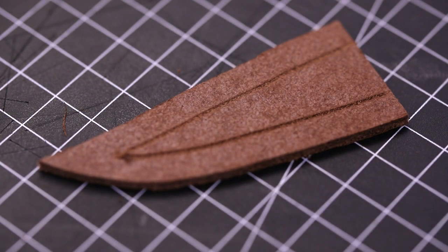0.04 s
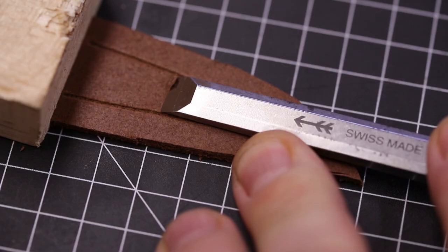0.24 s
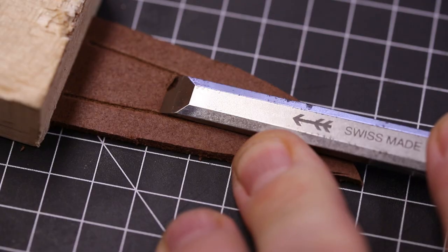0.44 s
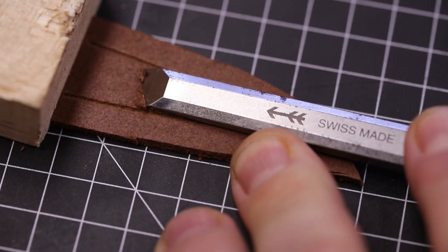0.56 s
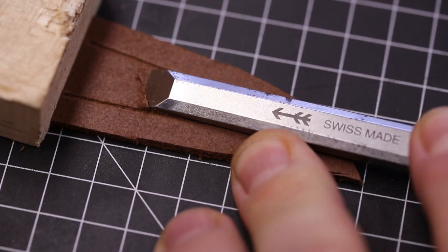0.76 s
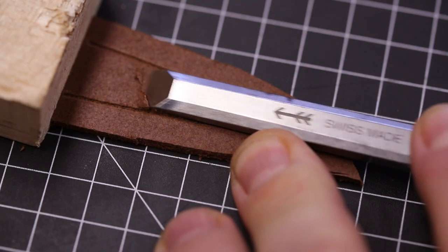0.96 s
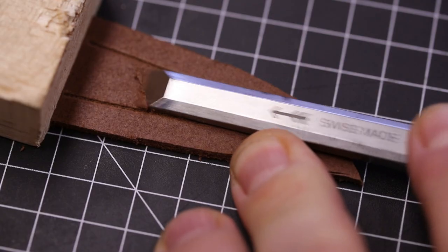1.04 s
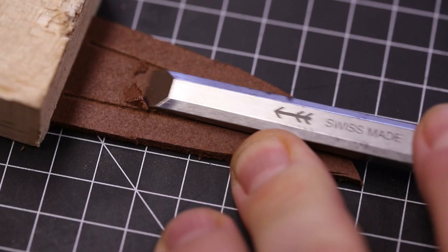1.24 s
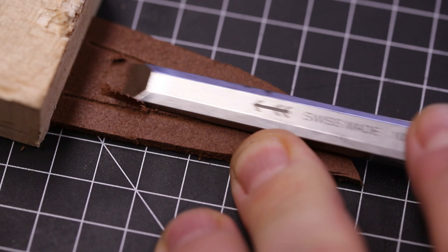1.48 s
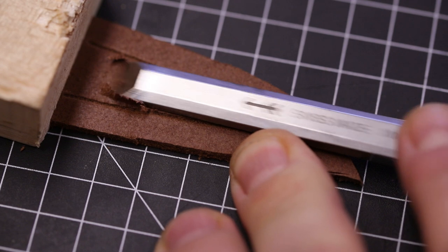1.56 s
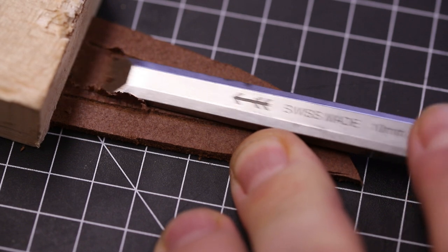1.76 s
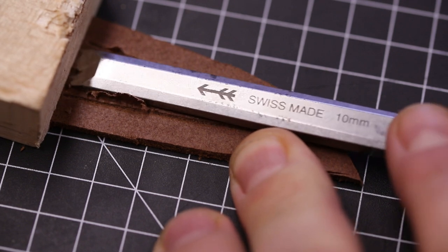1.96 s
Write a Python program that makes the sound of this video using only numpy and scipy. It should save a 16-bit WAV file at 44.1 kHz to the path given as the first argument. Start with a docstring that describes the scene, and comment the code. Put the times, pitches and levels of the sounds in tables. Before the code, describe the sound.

A chisel cuts thick leather in short pushes, heard close in a small boomy room. Faint room tone, soft rubs and light bench knocks come first. A swelling scrape breaks with a knock at 0.7 s, then lighter handling. Crunchy, tearing pushes follow around 1.2, 1.45 and 1.7 s, with thuds, bright scratches and a brief steel chirp at 1.75 s. A last scrape starts swelling near 1.97 s.

```python
"""Over faint room tone, hand and leather rub softly (shaped noise) and tool and hand knock lightly on a bench.
Then a chisel is pushed through thick leather, close to the microphone, in a small boomy room.
In each push the edge creeps with a swelling hiss of tiny snaps; in the first four it breaks through with a knock.
It then tears fibres in coarser snaps, very briefly in the first push; the steel rings and the bench shakes.
Low thumps of the room answer some knocks, bright scratches and steel chirps join in, and a fifth push creeps."""
import sys
import numpy as np
from scipy import signal
from scipy.fft import rfft, irfft
from scipy.io import wavfile
from scipy.ndimage import uniform_filter1d

SR = 44100
rng = np.random.default_rng(int(sys.argv[2]) if len(sys.argv) > 2 else 0)


def transcribe(signal):
    """Save signal, clipped to [-1, 1], as a 16-bit WAV file at the path in sys.argv[1]."""
    frames = np.atleast_2d(signal).T
    limited = np.clip(frames, -1, 1)
    pcm = np.round(limited * 32767).astype(np.int16)
    wavfile.write(sys.argv[1], SR, pcm)


N = 88905
T = np.arange(N) / SR  # time in s
FIBRES_PER_S, SNAPS_PER_S = 14000, 5500  # average rates of fine and coarse snaps
LEFT_RIGHT = np.array([[1], [-1]])  # plus on the left, minus on the right


def amp(db):
    """Turns decibels into a gain."""
    return 10 ** (np.asarray(db) / 20)


def unit(x):
    """Scales to an rms of 1."""
    return x / np.sqrt(np.mean(x ** 2) + 1e-20)


def read(points, hz):
    """Reads a table between its points, on a logarithmic frequency axis."""
    f, value = np.transpose(points)
    return np.interp(np.log(hz + 1), np.log(f + 1), value)


def add(mix, s, sound):
    """Mixes a sound in, starting at s seconds."""
    part = mix[round(s * SR):][:len(sound)]
    part += sound[:len(part)]


def through(x, response):
    """Passes a sound through an object, given how that object answers a single click."""
    return signal.fftconvolve(x, response)[:N]


def colour(points, tilt_db=0, size=4096):
    """A click of energy 1 with the given spectrum; the tilt nears tilt_db per octave in the treble."""
    hz = abs(np.fft.fftfreq(size, 1 / SR))
    gain_db = read(points, hz) + tilt_db * np.log2(1 + hz / 1000)
    log_gain = np.log(amp(gain_db))
    # this choice of phase puts the energy after the start of the click, as early as possible
    spectrum = np.exp(np.conj(signal.hilbert(log_gain)))
    click = np.fft.ifft(spectrum).real[:size // 2]
    return click / np.linalg.norm(click)


def ring(modes):
    """The dying tones (modes) of one struck object, with a total energy of 1."""
    t = T[:SR // 3]
    out = np.zeros(len(t))
    for k, (hz, db, t60) in enumerate(modes):
        fading = amp(db - 60 * t / t60) / np.sqrt(t60)
        out += fading * np.sin(2 * np.pi * hz * t) * (-1) ** k
    return out / np.linalg.norm(out)


def fibres(rate, spread_db):
    """Fibres snapping at random, in uneven sizes, evened out to a steady mean power."""
    size = amp(spread_db * np.minimum(rng.exponential(1, N), 4))
    happens = rng.random(N) < rate / SR
    snaps = size * rng.choice([-1., 1.], N) * happens
    power = abs(uniform_filter1d(snaps ** 2, size=700))
    return snaps / np.sqrt(power + 1e-9)


def clumps(per_s=240, spread_db=2.0):
    """Fibres give way in uneven bunches: a gain that wanders up and down."""
    at = np.cumsum(rng.uniform(.4, 1.6, 2000)) / per_s
    height = np.clip(rng.standard_normal(len(at)), -2, 2)
    return unit(amp(spread_db * np.interp(T, at, height)))


def arch(s, length):
    """A smooth rise and fall."""
    return np.sin(np.pi * np.clip((T - s) / length, 0, 1))


def taps(size):
    """Sparse reflections of random sign."""
    return rng.choice([-1., 1.], size) * (rng.random(size) < .1)


# room tone spectrum: f/Hz, level/dB (relative, per Hz)
AIR_SPECTRUM = [(20, -7), (70, 6.5), (140, 6), (300, -2.5), (600, -7), (1400, -11), (3000, -14.5),
                (8000, -17.5), (15500, -22.5)]
# how alike the room tone is on the left and right: f/Hz, likeness (1 = the same)
AIR_LIKENESS = [(40, 0.69), (200, 0.27), (700, 0.76), (2000, 0.15), (15000, 0.033)]


def air(level_db=-59):
    """Steady low room tone and faint hiss: noise that is partly shared by the two channels."""
    hz = np.fft.rfftfreq(N, 1 / SR)
    a, b = rfft(rng.standard_normal((2, N)))
    same = np.clip(read(AIR_LIKENESS, hz), -1, 1)
    pair = np.array([a, same * a + np.sqrt(1 - same ** 2) * b])
    return amp(level_db) * unit(irfft(pair * amp(read(AIR_SPECTRUM, hz)), N))


# soft rubs of hand and leather on the mat: t/s, length/s, grain level/dB, low rumble level/dB
RUBS_PLAYED = [(0.178, 0.064, -56, -59), (0.419, 0.044, -53, -45.5), (0.600, 0.33, -68, -52.5),
               (0.939, 0.04, -60.5, -46.5), (1.066, 0.11, -66, -53), (1.191, 0.22, -63, -49),
               (1.392, 0.055, -50, -51), (1.790, 0.11, -68, -51), (1.911, 0.042, -47.5, -46)]
# spectrum of the grain: f/Hz, level/dB (relative)
RUB_SPECTRUM = [(150, -29), (300, 1), (750, -1.5), (1100, -5), (1600, -6.5), (3000, -15.5), (8000, -49)]
# spectrum of the rumble: f/Hz, level/dB (relative)
RUMBLE_SPECTRUM = [(25, -22), (55, -5.5), (110, -8), (200, -1), (400, -19.5), (1500, -47.5)]


def rubs():
    """Dull friction: bunched snaps make the grain, and dark noise makes the rumble under it."""
    grain, weight = np.zeros((2, N))
    for s, length, db, rumble_db in RUBS_PLAYED:
        grain += amp(db) * arch(s, length)
        weight += amp(rumble_db) * arch(s, length)
    friction = grain * clumps() * fibres(SNAPS_PER_S, spread_db=4)
    rumble = weight * rng.standard_normal(N)
    return through(friction, colour(RUB_SPECTRUM)) + through(rumble, colour(RUMBLE_SPECTRUM))


# knocks through the leather into the bench, and low thumps of the room answering them (0.767, 1.308):
# t/s, thud level/dB and tick level/dB (both before the lifts in knocks_and_thumps), room boom level/dB,
# softening time of the thud/s, short tone f/Hz, short tone level/dB
KNOCKS_AND_THUMPS = [(0.192, -38.5, -58, -44.5, 0.0017, 261, -51),
                     (0.263, -39.5, -75, -81, 0.0012, 737, -57.5),
                     (0.4208, -30, -38.5, -47, 0.00031, 278, -41.5),
                     (0.435, -40, -44.5, -56, 0.00041, 1260, -50.5),
                     (0.592, -45, -52.5, -49, 0.0017, 245, -52.5),
                     (0.597, -31, -42, -40.5, 0.00033, 532, -47),
                     (0.697, -21.5, -31.5, -39.5, 0.0022, 277.5, -32),
                     (0.767, -39, -68, -42, 0.0035, 269, -42), (0.846, -48, -56, -51, 0.006, 564, -45.5),
                     (0.865, -34, -47.5, -47.5, 0.00062, 675, -44),
                     (0.956, -48, -68, -40.5, 0.0046, 287.4, -49.5),
                     (1.064, -30.5, -79, -46, .003, 333, -50),
                     (1.203, -27, -40, -35.5, 0.00038, 238.3, -31.5),
                     (1.212, -33, -31.5, -39, .001, 574, -32), (1.308, -68, -64, -62, 0.001, 309, -42),
                     (1.404, -63, -65, -65, 0.0017, 648, -47),
                     (1.47, -19.5, -60, -33.5, 0.00028, 255, -32.5),
                     (1.735, -20, -56, -40, 0.00042, 788, -30.5),
                     (1.777, -35, -46, -38.5, 0.0024, 274.4, -27.5),
                     (1.928, -27, -43, -34, 0.00057, 1525, -41)]
# spectrum of the thud: f/Hz, level/dB (relative)
THUD_SPECTRUM = [(25, -72), (70, -9), (140, 8), (270, -1), (380, -0.5), (560, 5), (850, -6.5),
                 (1400, -21.5), (2500, -63.5), (8000, -17)]
# spectrum of the tick: f/Hz, level/dB (relative)
TICK_SPECTRUM = [(200, -55), (800, -10), (1500, 13.5), (2100, 7), (3000, 10), (4200, -2.5), (5600, -1.5),
                 (8000, -14), (15000, -79)]
# low resonances of the room: f/Hz, level/dB, time to swell/s
ROOM_BOOM = [(96.5, -11.5, 0.058), (134.73, 2, 0.023), (161.6, -15, 0.031), (216.7, -8.5, 0.017),
             (255, -9, 0.014)]


def knocks_and_thumps(thud_lift_db=16, tick_lift_db=14, scuff_db=-25, scuff_s=.007, tone_cycles=1.34):
    """Knocks and the room's answering thumps: a soft thud, a tick, a few cycles of tone and a swelling boom."""
    thuds, ticks, tones, booms = np.zeros((4, N))
    t = T[:SR // 2]
    boom = np.zeros(len(t))
    for hz, db, swell in ROOM_BOOM:
        boom += amp(db) * t / swell * np.exp(1 - t / swell) * np.sin(2 * np.pi * hz * t)
    thud = colour(THUD_SPECTRUM)
    for s, low_db, high_db, boom_db, soften_s, tone_hz, tone_db in KNOCKS_AND_THUMPS:
        # a longer cushion (in a knock, a longer contact) makes a softer, duller thud
        cushion = np.sin(np.pi * np.minimum(t[:SR // 50] / soften_s, 1))
        soft_thud = np.convolve(thud, cushion / cushion.sum())
        scuff = amp(scuff_db) * np.exp(-t / scuff_s) * rng.standard_normal(len(t))
        tick = (t == 0) + scuff
        age = tone_hz * t / tone_cycles
        # in a knock, this is the ring of the struck spot
        tone = np.sqrt(age * np.exp(1 - age)) * np.sin(2 * np.pi * tone_hz * t)
        add(thuds, s, amp(low_db + thud_lift_db) * soft_thud)
        add(ticks, s, amp(high_db + tick_lift_db) * tick)
        add(tones, s, amp(tone_db) * tone)
        add(booms, s, amp(boom_db) * boom)
    return through(ticks, colour(TICK_SPECTRUM)) + tones, thuds, booms


def judder(depth_db, slips_per_s=160):
    """The edge sticks and slips unevenly: a gain that sinks, then jumps back at each slip."""
    slips = np.cumsum(rng.uniform(.5, 1.5, 1000)) / slips_per_s
    turn = np.interp(T, slips, np.arange(len(slips))) % 1
    return unit(amp(-depth_db * turn))


def nearby(x, share_db=-6):
    """Quick reflections from mat, fingers and stop block blur the snaps, differently in each push."""
    t = T[:700]
    echoes = taps(size=700) * np.exp(-t / .003) * (t > .0004)
    blurred = through(x, echoes / np.linalg.norm(echoes))
    return (x + amp(share_db) * blurred) / np.hypot(1, amp(share_db))


# pushes: creep starts t/s, edge breaks through t/s, slide stops t/s, hiss level/dB, swell of the hiss/dB,
# tearing level/dB, brightness/dB per octave, blade ring level/dB, bench shake level/dB
PUSHES_PLAYED = [(0.626, 0.696, 0.69, -37, 15.5, -49, 3, -38.5, -35.5),
                 (1.175, 1.22, 1.254, -39.5, 18.5, -36.5, -3, -41.5, -39.5),
                 (1.431, 1.471, 1.514, -41, 21, -34.5, -0.5, -39, -36.5),
                 (1.687, 1.728, 1.767, -41.5, 12, -36.5, 1.8, -37.5, -34.5),
                 (1.965, 2.03, 3.9, -38.5, 17.5, -42, -5, -39.5, -32.5)]
# spectrum of the leather's hiss: f/Hz, level/dB (relative, per Hz)
HISS_SPECTRUM = [(100, -26), (500, 1.5), (1100, -1.5), (2000, 1), (3200, 0.5), (4000, -13), (5200, -6.5),
                 (6300, -16.5), (9000, -19.5), (15500, -24)]
# spectrum of the tearing: f/Hz, level/dB (relative)
TEAR_SPECTRUM = [(200, -11), (700, 3.5), (1030, -2.5), (1350, -4.5), (2100, -1), (3000, 1.5), (3600, -8),
                 (5600, -5), (6300, -12), (10500, -18), (13500, -22), (15500, -38)]
# spectrum of the bench shake: f/Hz, level/dB (relative)
SHAKE_SPECTRUM = [(30, -40), (70, -10), (130, 5.5), (260, -3), (330, -6.5), (420, 1), (800, -13.5),
                  (1050, -10.5), (1400, -25.5), (4000, -80.5)]
# modes of the steel blade: f/Hz, level/dB (relative, of each mode's whole energy), t60/s (time to fall 60 dB)
BLADE_MODES = [(1600, -9.5, 0.14), (2030, -26, 0.051), (2567, 8, 0.028), (2682, 7, .03),
               (2620, -0.5, 0.022), (3720, -3, 0.019), (4226, -2, 0.055), (4680, -19, .04),
               (5630, -6.5, 0.12), (6200, -22, 0.08), (8000, -28, .04), (9100, -13.5, 0.11),
               (10550, -17, 0.014)]
STOP_DB_PER_S, SHAKE_STOP_DB_PER_S = 745, 431  # how fast the cutting and the shaking die away
BITE_S = .002  # how quickly creep and slide set in
CREEP_RING_DB, CREEP_SHAKE_DB = -6, -7  # creep drives blade and bench less than the slide does


def pushes():
    """Each push swells as it creeps, then slides and tears; the snapping rings the blade and shakes the bench."""
    bunches = clumps()
    fine = fibres(FIBRES_PER_S, spread_db=3)
    coarse = fibres(SNAPS_PER_S, spread_db=4)
    slip = judder(depth_db=1.5) * bunches
    cut, steel, shake = np.zeros((3, N))
    for start, breaks, stop, hiss_db, swell_db, tear_db, bright_db, ring_db, shake_db in PUSHES_PLAYED:
        after = np.maximum(T - breaks, 0)
        stopped = np.maximum(T - stop, 0)
        # the hiss starts swell_db down and is full when the edge breaks through
        still_to_go = np.clip((breaks - T) / max(breaks - start, BITE_S), 0, 1)
        onset = np.clip((T - start) / BITE_S, 0, 1)
        creep = onset * amp(-swell_db * still_to_go - STOP_DB_PER_S * after)
        bite = np.minimum(after / BITE_S, 1)
        slide = bite * amp(-STOP_DB_PER_S * stopped)
        shaking = bite * amp(-SHAKE_STOP_DB_PER_S * stopped)
        hiss = through(amp(hiss_db) * creep * bunches * fine, colour(HISS_SPECTRUM))
        tear = through(amp(tear_db) * slide * slip * coarse, colour(TEAR_SPECTRUM, bright_db))
        cut += nearby(hiss + tear)
        steel += amp(ring_db) * np.maximum(slide, amp(CREEP_RING_DB) * creep)
        shake += amp(shake_db) * np.maximum(shaking, amp(CREEP_SHAKE_DB) * creep)
    blade = through(steel * slip * fibres(SNAPS_PER_S, spread_db=5), ring(BLADE_MODES))
    push = through(shake * slip * fibres(SNAPS_PER_S, spread_db=2), colour(SHAKE_SPECTRUM))
    return cut + blade, push


# bright scratches as the edge grips or fibres part: t/s, length/s, level/dB, centre f/Hz, sharpness Q
SCRATCHES_PLAYED = [(0.636, 0.0098, -51, 4770, 1.7), (0.65, 0.054, -50.5, 4870, 4.4),
                    (0.697, 0.023, -52, 2830, 6.8), (0.936, 0.017, -59, 2730, 5.7),
                    (1.188, .013, -42.5, 3050, 4.9), (1.214, 0.0047, -41, 3040, 2),
                    (1.452, 0.015, -44.5, 3140, 15), (1.477, 0.017, -52, 5600, 1.5),
                    (1.698, 0.049, -43.5, 4300, 3.4), (1.735, 0.018, -38.5, 6200, 3.5),
                    (1.773, 0.013, -36.5, 2320, 5.3)]


def scratches():
    """Short bursts of fine snaps, each in its own bright band."""
    grain = fibres(FIBRES_PER_S, spread_db=3.5)
    out = np.zeros(N)
    click = T[:SR // 50] == 0
    for s, length, db, hz, q in SCRATCHES_PLAYED:
        band = signal.lfilter(*signal.iirpeak(hz, max(q, .8), fs=SR), click)
        out += through(amp(db) * arch(s, length) * grain, band / np.linalg.norm(band))
    return out


# small chirps of steel against leather: t/s, level/dB, f/Hz, t60/s (time to fall 60 dB)
CHIRPS_PLAYED = [(1.503, -31, 2610, 0.055), (1.520, -47.5, 4226, 0.19), (1.7517, -16.5, 2627, 0.021),
                 (2.008, -34.5, 2610, 0.065)]


def chirps(rise_s=0.0011):
    """The edge catches and one mode of the steel sings for a moment: a dying tone of fixed pitch."""
    t = T[:SR // 4]
    out = np.zeros(N)
    for s, db, hz, t60 in CHIRPS_PLAYED:
        loudness = np.minimum(t / rise_s, 1) * amp(db - 60 * t / t60)
        add(out, s, loudness * np.sin(2 * np.pi * hz * t))
    return out


# how long the room's echo lasts: f/Hz, t60/s (time to fall 60 dB)
ECHO_T60 = [(100, .5), (260, 0.11), (700, 0.37), (1800, 0.4), (2600, 0.7), (4500, 1.5), (14000, 0.5)]
# how strong the room's echo is: f/Hz, level/dB
ECHO_LEVEL = [(60, 1.5), (135, 3.5), (200, -3.5), (290, -7.5), (600, -12), (1100, -14), (1900, -15),
              (2600, -24.5), (3400, -17.5), (4300, -16.5), (5500, -19.5), (14000, -16.5)]


def room(x, build_s=0.004):
    """One channel of reverberation: random reflections, strongest in the bass, longest in the treble."""
    hz, t, z = signal.stft(taps(size=SR), SR, nperseg=512)
    t60 = np.maximum(read(ECHO_T60, hz), .02)[:, None]
    even_energy = np.sqrt(2 * np.log(1000) / t60 / (.1 * SR))  # long and short tails start out equal in energy
    z = z * amp(-60 * t / t60) * even_energy
    tail = signal.istft(z * amp(read(ECHO_LEVEL, hz))[:, None], SR, nperseg=512)[1]
    return through(x, tail * (1 - np.exp(-T[:len(tail)] / build_s)))


# how alike the two channels are: f/Hz, likeness (1 = the same)
CHANNEL_LIKENESS = [(100, .99), (900, .99), (2700, .98), (3600, .8), (6000, .6), (15000, .65)]
# how far the left channel leads: f/Hz, phase/radians
LEFT_LEAD = [(60, .2), (300, .42), (900, .1), (1700, .2), (2600, 1.0), (3200, 1.2), (3800, 0), (4400, 2.6),
             (5400, .2), (7000, 1.1), (10000, .1)]
# left minus right: f/Hz, level/dB
LEFT_BALANCE = [(130, 0.9), (300, 1.4), (750, 4), (1700, 1.2), (2100, -4), (2600, 3.5), (4200, -2.5),
                (4800, 19.5), (5400, -9.5), (7000, 4.5), (13000, -1)]


def microphones(x):
    """Two capsules hear the work a little to the left; hands and bench scatter the treble."""
    size = 2 * N
    hz = np.fft.rfftfreq(size, 1 / SR)
    scatter = taps(size=1000) * np.exp(-T[:1000] / .004)
    scattered = rfft(scatter / np.linalg.norm(scatter), size)
    same = np.clip(read(CHANNEL_LIKENESS, hz), 0, 1)
    pair = np.sqrt((1 + same) / 2) + LEFT_RIGHT * np.sqrt((1 - same) / 2) * scattered
    pair = pair * amp(LEFT_RIGHT * read(LEFT_BALANCE, hz) / 2)
    pair = pair * np.exp(.5j * LEFT_RIGHT * read(LEFT_LEAD, hz))
    return irfft(rfft(x, size) * pair, size)[:, :N]


# modes of the bench: f/Hz, level/dB (relative, of each mode's whole energy), t60/s (time to fall 60 dB)
BENCH_MODES = [(178, -2, 0.2), (249.9, -7, 0.27), (279.7, -2, 0.21), (323.1, -3, 0.19), (404, 2, 0.043),
               (440, -4, 0.33), (529, -4.5, 0.39), (742, -3, 0.26), (798, -6, 0.034), (1026, 4.5, 0.13)]
# width of the room's tail: f/Hz, level/dB of the part that is opposite in the two channels
TAIL_WIDTH = [(130, -7.5), (700, -6.5), (4000, -7)]


def scene(bench_db=-16):
    """Pushes and thuds ring the bench; a second echo, opposite in the two channels, makes the room wide."""
    cut, push = pushes()
    ticks, thuds, booms = knocks_and_thumps()
    force = push + thuds
    bench = amp(bench_db) * through(force, ring(BENCH_MODES))
    near = cut + scratches() + chirps() + rubs() + ticks + force + bench
    hz = np.fft.rfftfreq(N, 1 / SR)
    wide = irfft(rfft(room(near)) * amp(read(TAIL_WIDTH, hz)), N)
    return microphones(near + booms + room(near)) + wide * LEFT_RIGHT + air()


def record(dry, edge_hz=15750):
    """The recorder's band limit: a steep filter removes what lies above edge_hz."""
    low_pass = signal.firwin(511, edge_hz, window=("kaiser", 9), fs=SR)
    return signal.oaconvolve(dry, low_pass[None], "same")


dry = scene()
out = record(dry)
transcribe(out)
```